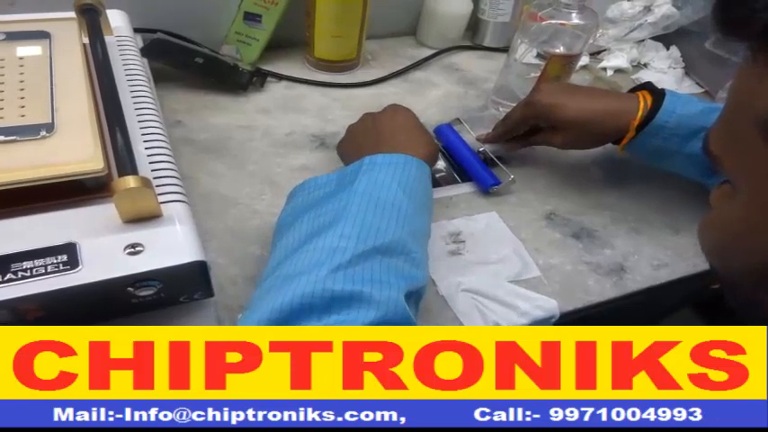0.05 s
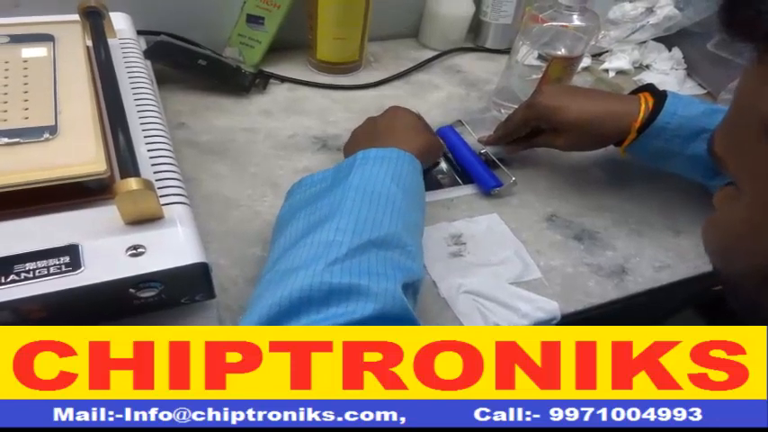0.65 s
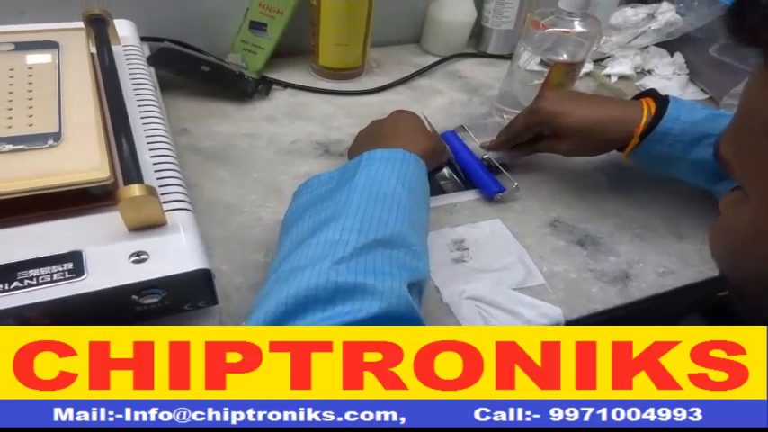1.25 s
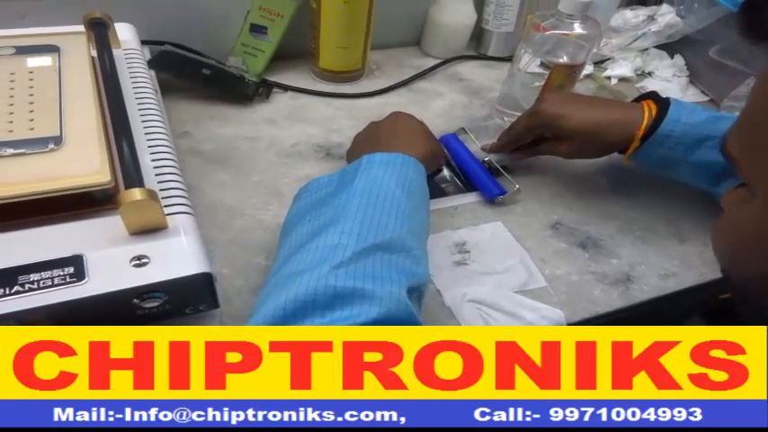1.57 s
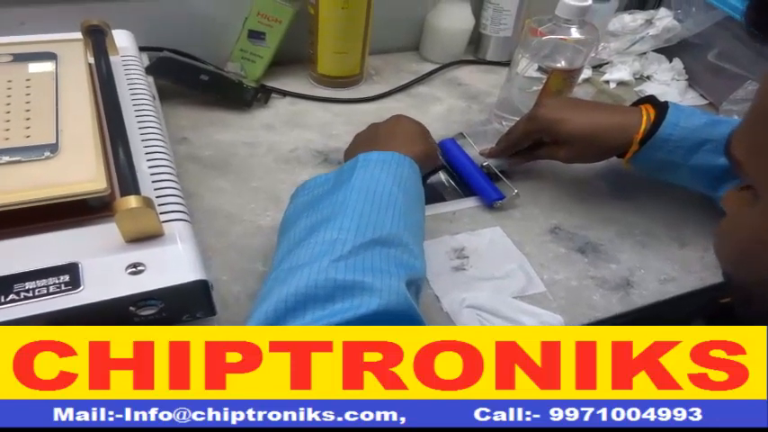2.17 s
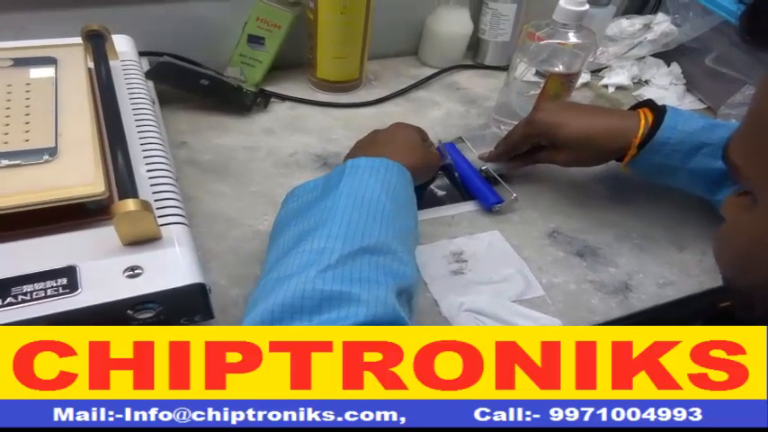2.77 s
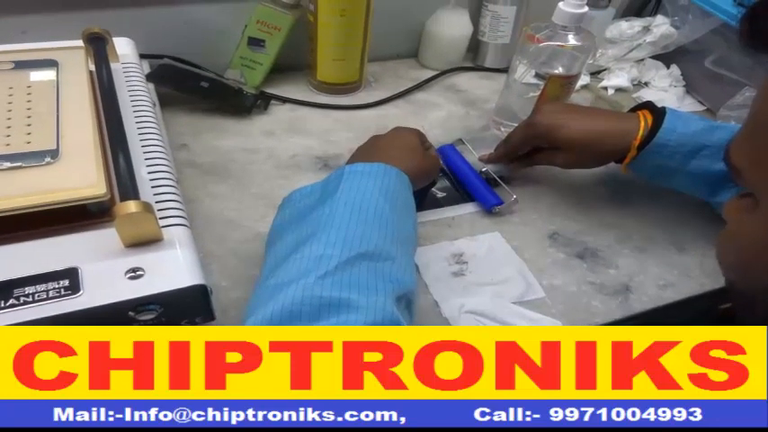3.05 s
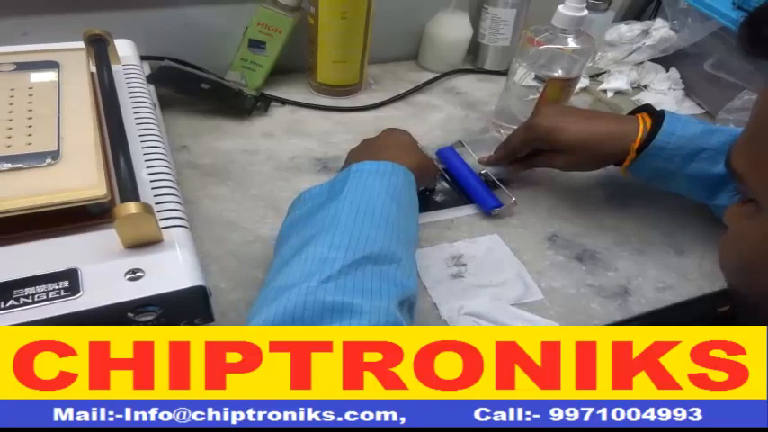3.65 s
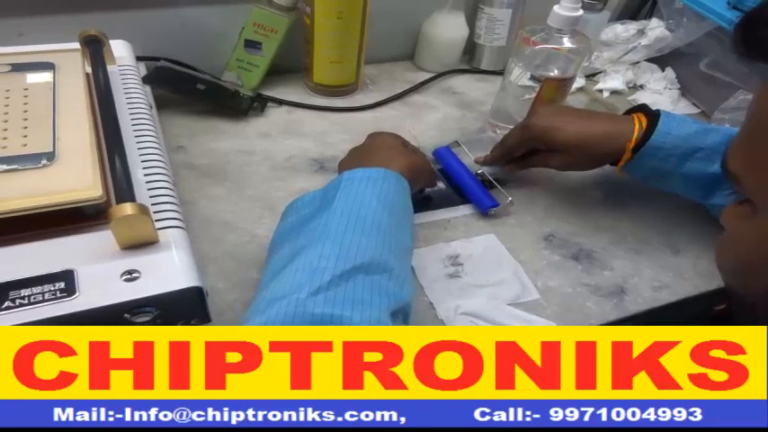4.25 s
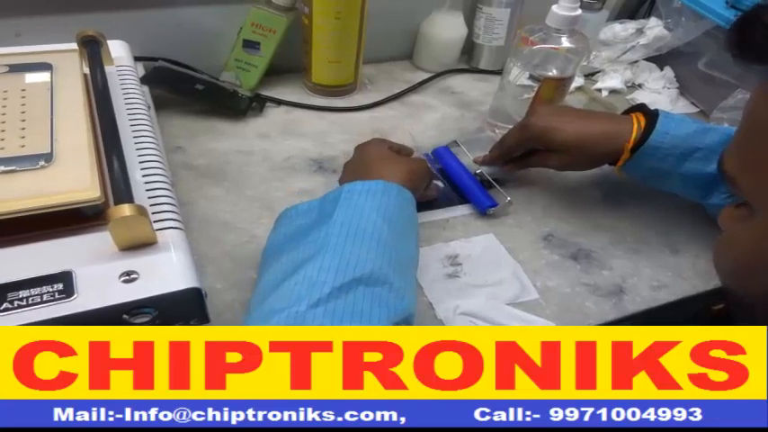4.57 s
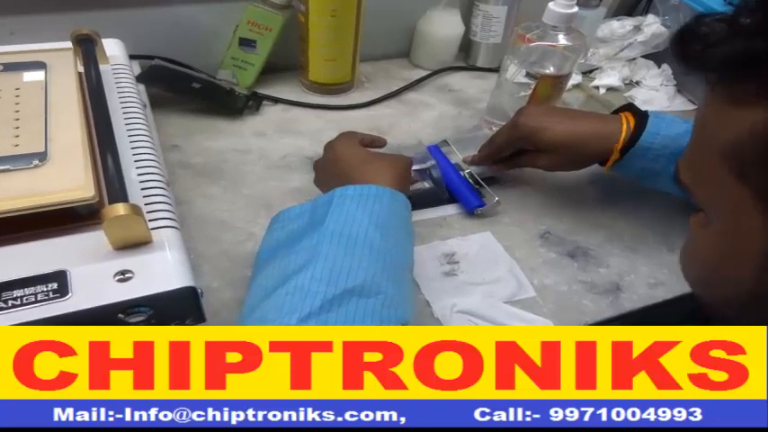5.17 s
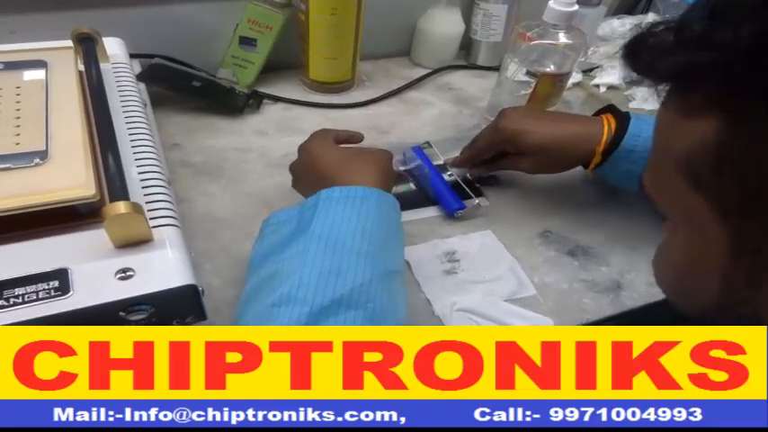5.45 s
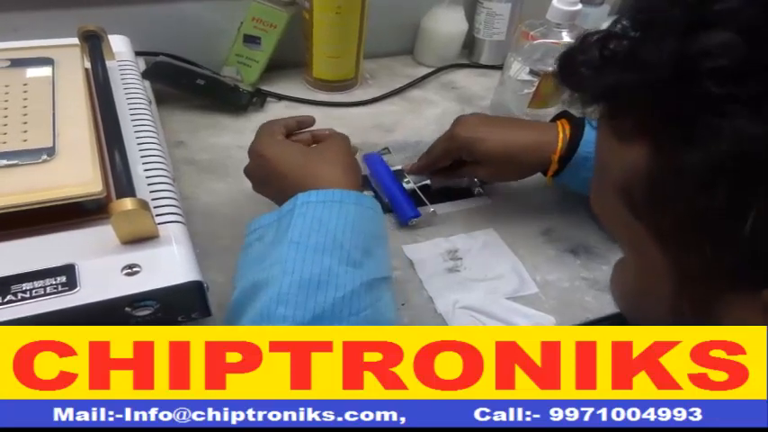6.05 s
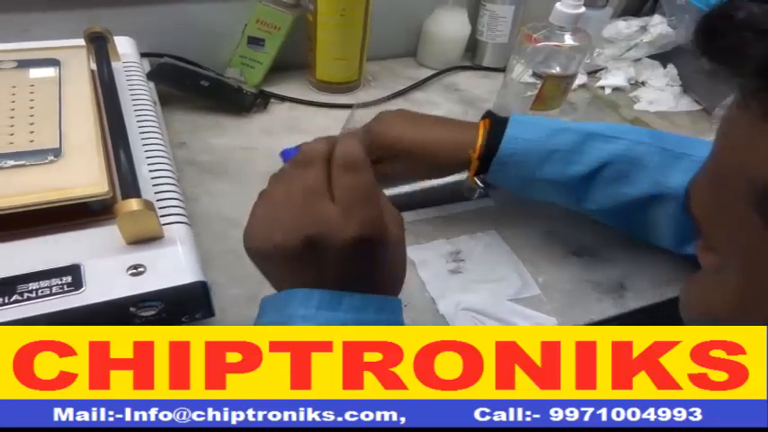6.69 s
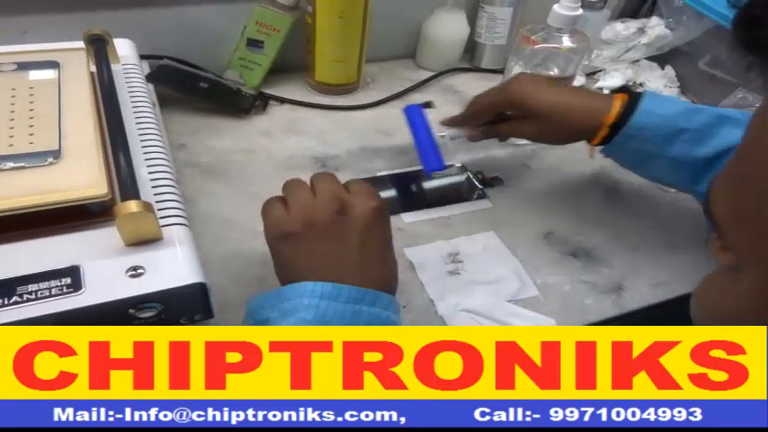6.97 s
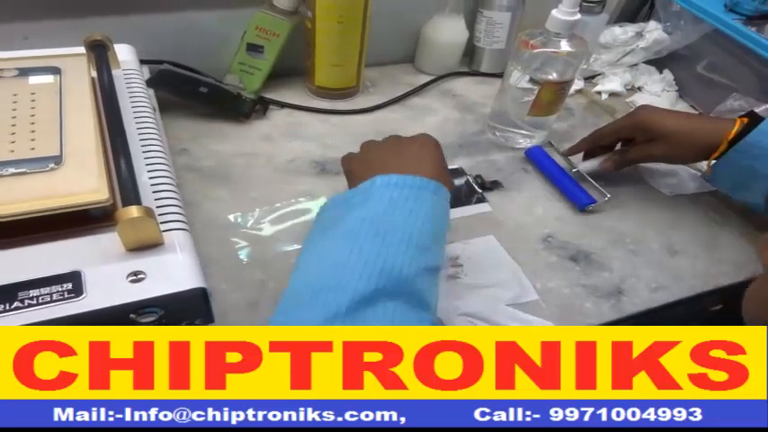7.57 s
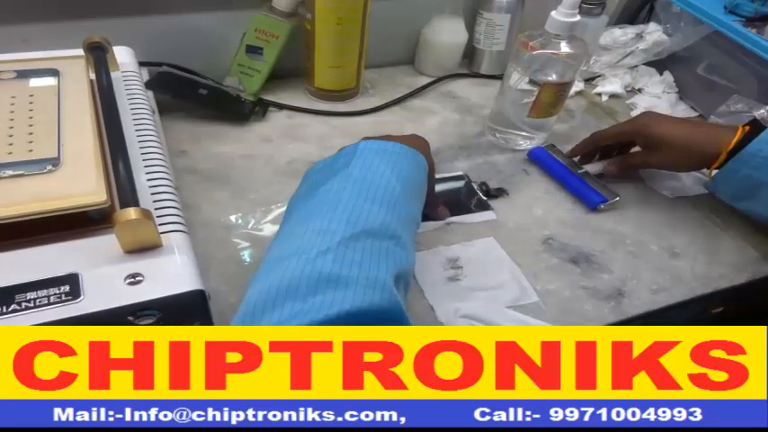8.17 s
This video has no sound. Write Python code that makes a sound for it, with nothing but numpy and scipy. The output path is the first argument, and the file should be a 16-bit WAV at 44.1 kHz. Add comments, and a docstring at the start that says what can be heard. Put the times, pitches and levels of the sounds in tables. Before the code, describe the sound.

A low machine hum and dull room noise run throughout in a small workroom, the hum growing slightly around 4 seconds. Straight ahead, adhesive film ticks and snaps as a rubber hand roller presses it onto glass, with the sharpest snaps at about 1.1 and 2.8 seconds and a few soft bumps on the bench. At 3.3 seconds the rubber gives a very short, high squeak, followed by light, scattered clicks until about 4.4 seconds. From 6 to 7 seconds the roller clicks and rattles in a quick cluster, while a sleeve rubs and the film slides with a crackly hiss, strongest around 6.5 seconds. Softer rustling continues. At 7.5 seconds the roller's metal frame clinks and bounces on the stone bench with a dull thud. A small click follows, then another clink and a low thump at about 8.3 seconds.

```python
"""A small room with a stone workbench, where a rubber hand roller presses adhesive film onto phone glass.
The film snaps as it sticks or lets go; the roller clicks against the glass and its rubber squeaks.
A sleeve and the film rustle as they slide. Put down, the roller's metal frame clinks and bounces
and the bench thuds. Behind the work, a machine hums and drones over steady room noise."""
import sys
import numpy as np
from scipy import signal
from scipy.fft import rfft, irfft
from scipy.io import wavfile

SR = 44100
rng = np.random.default_rng(int(sys.argv[2]) if len(sys.argv) > 2 else 0)


def store_pcm(level_fs):
    """Save levels as 16-bit WAV."""
    pcm = np.round(np.clip(level_fs, -1, 1) * 32767).astype(np.int16)
    wavfile.write(sys.argv[1], SR, np.atleast_2d(pcm).T)


N = 371406
LEAD_S = .005   # a contact gives for this long before it snaps

# how alike left and right are in the room: pitch_hz, correlation
STEREO_LIKENESS = [(50, 1), (130, 0.97), (270, 0.71), (570, -.3), (1200, -.25), (2400, 0.18), (5200, 0.46),
                   (10500, 0.86)]
# modes of the bench top: pitch_hz, level_db, t60_s
BENCH_MODES = [(122.5, 10, 0.085), (245, -8, 0.13), (285, -5, 0.3), (353, -14, 0.1), (400, -1, 0.15),
               (464, -6, 0.15), (488, -1, 0.22), (574, -29, 0.1), (658, 2, 0.18), (800, -27, .08),
               (1170, -19, .06)]
# snaps of the film: start_s, level_db, bright_db, t60_s, spot_hz, room_send_db, top_db
FILM_SNAPS = [(0.967, -46.5, 7, 0.068, 10000, -8, 4), (1.040, -49.5, 0, .025, 10000, -4, 3),
              (1.124, -20, 1.5, 0.042, 3480, -4.5, 7.5), (1.7013, -46.5, -6, 0.028, 6050, -18, 3),
              (1.732, -43, -9, 0.069, 6140, -2.5, -2), (2.360, -52.5, 10, 0.03, 9600, -2, -1),
              (2.389, -60, 4, .03, 9500, -6, 2), (2.5941, -38.5, 7, 0.057, 7160, -10, -3),
              (2.611, -46, -2, 0.033, 7200, -7, -2), (2.8022, -23.5, 0.5, 0.06, 6070, -6.5, -3.5),
              (4.2218, -39, -7, .045, 2700, -8, 2), (5.573, -43, 3, 0.04, 2670, -0.5, -2)]


def from_db(db):
    """Decibels to gain."""
    return 10 ** (np.asarray(db) / 20)


def rms_one(x):
    """Scale to an rms of 1."""
    return x / np.sqrt(np.mean(x ** 2) + 1e-20)


def above(db, still_db):
    """Gain of the part of a level that exceeds its resting value."""
    return np.sqrt(np.maximum(from_db(db) ** 2 - from_db(still_db) ** 2, 0))


def in_time(rows):
    """Each column of an automation table, at every sample."""
    times_s, *columns = np.transpose(rows)
    return [np.interp(np.arange(N) / SR, times_s, column) for column in columns]


def at_hz(points, hz):
    """Read a table on a log-frequency axis."""
    points = np.array(points)
    return np.interp(np.log(hz), np.log(points[:, 0]), points[:, 1])


def add(track, start_s, sound):
    """Mix a sound into a track."""
    start = round(start_s * SR)
    track[..., start:start + sound.shape[-1]] += sound[..., :N - start]


def drift(rate_hz):
    """Slow random wander with a spread of 1."""
    pole = np.exp(-80 * np.pi * rate_hz / SR)   # one step every 40 samples
    steps = rng.standard_normal(N // 40 + 2002)
    slow = signal.lfilter([1], [1, -2 * pole, pole * pole], steps)[2000:]
    return np.interp(np.arange(N) / 40, np.arange(len(slow)), rms_one(slow))


def ring(x, hz, t60):
    """A resonator: a unit click sets a decaying sine ringing."""
    radius, angle = from_db(-60 / (t60 * SR)), 2 * np.pi * hz / SR
    return signal.lfilter([0, np.sin(angle)], [1, -2 * radius * np.cos(angle), radius ** 2], x + 1e-18)


def dying(t, t60):
    """Exponential decay, 60 dB down after t60."""
    return np.exp(-np.log(1000) * t / t60)


def struck(t, hz, t60, phase=0):
    """One struck mode: a decaying sine."""
    return np.sin(2 * np.pi * hz * t + phase) * dying(t, t60)


def bell(grid, hz, width):
    """Shape of a resonance over frequency, 1 on top."""
    return 1 / (1 + (2 * (grid - hz) / width) ** 2)


def colour(x, spectrum):
    """Minimum-phase EQ that follows a spectrum in dB."""
    size = 1024
    grid = np.arange(size // 2 + 1) * SR / size + 1
    cepstrum = irfft(np.log(from_db(at_hz(spectrum, grid))))
    cepstrum[1:size // 2] *= 2
    cepstrum[size // 2 + 1:] = 0
    impulse = irfft(np.exp(rfft(cepstrum)))
    return signal.fftconvolve(x, impulse)[:len(x)]


def stereo_bands(size, direct=0):
    """Third-octave noise as (centre_hz, band); more direct sound narrows the stereo image."""
    edges = 22 * 2 ** (np.arange(29) / 3)
    white = rng.standard_normal((2, 2, size))
    for k, (low, high) in enumerate(zip(edges, edges[1:])):
        bandpass = signal.butter(2, [low, high], "band", fs=SR, output="sos")
        mid, side = signal.sosfilt(bandpass, white[k % 2])
        hz = np.sqrt(low * high)
        alike = np.clip(direct + (1 - direct) * at_hz(STEREO_LIKENESS, hz), -1, 1)
        yield hz, np.sqrt(1 + alike) * mid + np.sqrt(1 - alike) * side * [[1], [-1]]


def shaped_noise(spectrum, direct=0, flicker_db=2.4):
    """Stereo noise whose bands flicker slightly on their own; rms 1."""
    return rms_one(sum(from_db(at_hz(spectrum, hz) + flicker_db * drift(18)) * band
                       for hz, band in stereo_bands(N, direct)))


def room(x, build_s=0.00081):
    """A diffuse tail that builds up within milliseconds and dies sooner in the treble."""
    # reverb time: pitch_hz, t60_s
    decay_times = [(150, 0.88), (1000, 0.41), (4000, 0.37), (10000, 0.28)]
    t = np.arange(SR // 2) / SR
    tail = sum(band * dying(t, at_hz(decay_times, hz)) for hz, band in stereo_bands(len(t), direct=0.41))
    tail *= 1 - np.exp(-(t / build_s) ** 2)
    return signal.fftconvolve(x[None], rms_one(tail) / np.sqrt(len(t)), axes=1)[:, :N]


def room_tone(level_db=-50.5):
    """Steady, dark room noise."""
    # spectrum of the air: pitch_hz, density_db
    air_spectrum = [(22, -8), (50, -4.5), (110, 0), (180, -7.5), (280, -6.5), (500, -18.5), (850, -11.5),
                    (1200, -20.5), (1900, -20.5), (2400, -39), (3000, -29), (7000, -32.5), (11000, -36.5),
                    (14000, -62)]
    return from_db(level_db) * shaped_noise(air_spectrum)


def machine(hum_hz=99.6, waver_rad=0.69):
    """A machine and its fan drone in narrow resonances over a slightly wavering mains hum."""
    # resonances of machine and fan: pitch_hz, width_hz, level_db
    drone_modes = [(60.4, 2.7, -57), (122, 7.5, -53.5), (293, 13.7, -61.5), (987, 19, -67.5),
                   (1458, 20, -69.5), (1773, 65, -64.5)]
    # the hum dips, swells, then holds: time_s, level_db
    hum_curve = [(0, -52), (1.5, -55.5), (3.8, -47.5), (8.42, -47.5)]
    drone = 0
    for hz, width, db in drone_modes:
        spread = np.sqrt(np.clip(1 - at_hz(STEREO_LIKENESS, hz), 0, 1))
        drive = rng.standard_normal(N) + spread * rng.standard_normal((2, N))
        t60 = np.log(1000) / (np.pi * width)
        drone += from_db(db) * rms_one(ring(drive, hz, t60))
    hum_db, = in_time(hum_curve)
    hum = np.sqrt(2) * np.sin(2 * np.pi * hum_hz * np.arange(N) / SR + waver_rad * drift(2.0))
    return drone + from_db(hum_db + .5 * drift(5.7)) * hum


def faint_tone(peak_s=3.13, half_length_s=0.28, pitch_hz=318, level_db=-57.5):
    """A faint low tone comes and goes in the background."""
    t = np.arange(N) / SR
    swell = np.exp(-((t - peak_s) / half_length_s) ** 2)
    return from_db(level_db) * swell * np.sqrt(2) * np.sin(2 * np.pi * pitch_hz * t + 0.46 * drift(8))


def crackle(spectrum, grains_per_s=220):
    """Dense, tiny sticky crackles; rms 1."""
    sizes = from_db(4 * np.minimum(rng.exponential(1, N), 2.2))
    grains = sizes * (rng.random(N) < grains_per_s / SR)
    patter = signal.fftconvolve(grains, dying(np.arange(SR // 50) / SR, t60=.008))[:N]
    return rms_one(colour(patter * rng.standard_normal(N), spectrum))


def sliding(rub_gain_db=3.5, hiss_gain_db=-0.24, flutter_db=0.5):
    """The sleeve gives a dull rub, the film a crackly hiss; both flutter as they catch and slip."""
    # sleeve and film moving over the bench: time_s, rub_db, hiss_db
    slide_curves = [(0.12, -57.5, -65.5), (0.33, -60, -66.5), (1.21, -58.5, -61.5), (1.35, -59.5, -64.5),
                    (2.41, -59, -66.5), (2.75, -59.5, -61.5), (4.02, -57.5, -63), (4.49, -54, -55),
                    (4.95, -56.5, -60.5), (6.11, -53.5, -57), (6.22, -50.5, -49), (6.38, -42, -45),
                    (6.54, -44.5, -41), (6.75, -49.5, -49.5), (7.06, -52.5, -55), (7.49, -49.5, -52.5),
                    (8.07, -54, -59), (8.42, -57.5, -69)]
    # spectrum of the cloth: pitch_hz, density_db
    rub_spectrum = [(60, -6), (150, -7.5), (300, -2.5), (450, -4), (650, -0.5), (1100, -7), (1700, -7.5),
                    (3000, -28), (8000, -55)]
    # spectrum of the film: pitch_hz, density_db
    hiss_spectrum = [(300, -22), (1000, -15), (2200, 5.5), (3500, 1.5), (5000, 0.5), (7000, 0),
                     (10800, -4.5), (14000, -25)]
    rub_db, hiss_db = in_time(slide_curves)
    hiss = 0.99 * shaped_noise(hiss_spectrum, direct=0.31) + 0.58 * crackle(hiss_spectrum)
    film = from_db(hiss_gain_db) * above(hiss_db, still_db=-66.5) * hiss
    cloth = from_db(rub_gain_db) * above(rub_db, still_db=-60) * shaped_noise(rub_spectrum, direct=0.36)
    return from_db(flutter_db * drift(19)) * (film + cloth)


def scuffs():
    """Brief, bright swells of hiss and crackle as the film peels or is brushed."""
    # scuffs of the film: peak_s, half_length_s, level_db
    swells = [(0.523, 0.06, -64.5), (1.111, 0.006, -39), (3.09, 0.016, -57), (3.288, 0.0071, -54),
              (3.317, 0.01, -44), (3.36, .005, -47), (4.264, 0.0098, -39.5), (5.71, 0.037, -55),
              (5.895, 0.021, -52.5), (6.218, 0.0075, -31), (6.473, 0.042, -40), (7.005, 0.023, -38.5),
              (7.348, 0.09, -48)]
    # spectrum of a scuff: pitch_hz, density_db
    spectrum = [(300, -34), (1600, -13), (2900, 5), (4500, 2), (7000, 2), (10500, -3), (14000, -22)]
    t = np.arange(N) / SR
    level = sum(from_db(db) * np.exp(-.5 * ((t - peak_s) / half_s) ** 2) for peak_s, half_s, db in swells)
    return level * (0.95 * shaped_noise(spectrum, direct=0.52) + 0.59 * crackle(spectrum))


def hand_bumps(rise_s=0.018, t60_s=0.29):
    """A hand leaning on the bench swells its lowest mode."""
    # soft pushes: start_s, level_db
    pushes = [(0.245, -32), (1.396, -37), (3.402, -36)]
    out, t = np.zeros(N), np.arange(SR // 2) / SR
    bump = struck(t, BENCH_MODES[0][0], t60_s) * (1 - np.exp(-t / rise_s))
    for start_s, db in pushes:
        add(out, start_s, from_db(db) * bump)
    return out


def bench_knocks(split_hz=670.0, low_rise_s=0.0059, modes_db=-7.0):
    """Soft blows ring the bench over a dull thud whose lows linger; heavy ones make it all thump."""
    # blows on the bench: start_s, level_db, thump_db
    blows = [(3.358, -47, -15), (6.305, -36.5, 1), (6.429, -46, -19), (7.531, -35, -5), (7.556, -43, 8),
             (7.597, -46, -4), (8.334, -41.5, -13), (8.349, -43.5, 18)]
    # spectrum of the thud: pitch_hz, density_db
    thud_spectrum = [(50, -7.5), (130, 4), (200, -3.5), (300, 2.5), (480, -2.5), (680, -3.5), (900, -15),
                     (1500, -23), (4000, -29)]
    out, t = np.zeros(N), np.arange(SR // 2) / SR
    thump = struck(t, hz=157, t60=0.17)   # the whole bench bouncing
    crossover = [signal.butter(4, split_hz, side, fs=SR, output="sos") for side in ("low", "high")]
    for start_s, db, thump_db in blows:
        modes = sum(from_db(mode_db) * rng.choice([-1, 1]) * struck(t, hz, t60)
                    for hz, mode_db, t60 in BENCH_MODES)
        noise = rms_one(colour(rng.standard_normal(len(t)), thud_spectrum))
        low, high = (signal.sosfilt(side, noise) for side in crossover)
        thud = low * (1 - np.exp(-t / low_rise_s)) * dying(t, t60=0.45) + high * dying(t, t60=0.15)
        add(out, start_s, from_db(db) * (from_db(modes_db) * modes + from_db(thump_db) * thump + thud))
    return out


def rubber_squeaks(rise_s=0.0015, sag_hz_per_s=14000.0):
    """The rubber lets go of the glass with very short chirps that sag in pitch."""
    # slips of the rubber: start_s, pitch_hz, level_db, t60_s
    slips = [(3.3217, 3726, -10, 0.018), (3.3272, 3550, -27, 0.051)]
    out, t = np.zeros(N), np.arange(SR // 25) / SR
    onset = 1 - np.exp(-(t / rise_s) ** 2)
    for start_s, hz, db, t60 in slips:
        phase = 2 * np.pi * np.cumsum(hz - sag_hz_per_s * t) / SR
        add(out, start_s, from_db(db) * np.sin(phase) * onset * dying(t, t60))
    return out


def give(t):
    """The very short swell that leads into a snap."""
    return np.exp(np.minimum(t - LEAD_S, 0) / .001)


def contact_spectrum(bright_db, spot_hz, top_db, spot_db=7.5, spot_q=19.0):
    """EQ of one touch: a brighter one has less body and presence, and more top."""
    # resonances of glass, film and roller together: pitch_hz, width_hz, boost_db
    click_modes = [(1120, 42, 1.5), (2230, 65, 4), (3110, 42, 1), (3220, 81, -2), (3700, 99, -4.5),
                   (4150, 41, -0.5), (5540, 100, -1.5), (6120, 510, 3.5), (6550, 82, 3.5), (7060, 260, 1.5),
                   (8200, 120, 2), (8530, 210, -3.5), (9320, 93, 6), (10130, 830, 5)]
    grid = np.geomspace(100, 14000, 900)
    # every touch favours different resonances, and the touched spot adds one of its own
    resonances = sum((db + rng.normal(0, 2)) * bell(grid, hz, width) for hz, width, db in click_modes)
    spot = spot_db * bell(grid, spot_hz, spot_hz / spot_q)
    body, presence, top = -6 - bright_db, 1.05 - 0.55 * bright_db, top_db + 0.13 * bright_db
    tone = [(250, body - 6), (800, body), (2200, body - .5), (3200, presence), (4700, presence),
            (6200, 2.0), (8000, 3.0), (9800, top), (11000, top - 5), (13000, -22.0)]
    return np.column_stack([grid, at_hz(tone, grid) + resonances + spot])


def contact(bright_db, t60, spot_hz, top_db, spike, echo_share=.35):
    """A crack of height spike, its echo off the bench and a gritty burst: (direct, room send)."""
    t = np.arange(SR // 3) / SR
    attack, lead = SR // 200, round(LEAD_S * SR)
    spectrum = contact_spectrum(bright_db, spot_hz, top_db)
    grit_db = np.interp(t * 600, np.arange(201), rng.normal(0, 2.5, 201))
    burst = rng.standard_normal(len(t)) * from_db(grit_db) * give(t) * dying(t, t60)
    burst[lead] = spike
    echo_s = rng.uniform(.0012, .0024)
    burst[lead + round(echo_s * SR)] = echo_share * spike
    # the room gets the smoother sum of all directions
    all_round = .45 * burst
    all_round[lead] = .9 * np.linalg.norm(burst)
    click = np.array([colour(burst, spectrum), colour(all_round, spectrum)])
    attack_rms = np.sqrt(np.mean(click[0, lead:lead + attack] ** 2))
    return click / attack_rms


def frame_ring(scatter_db=4.0):
    """The roller's metal frame rings, with a new balance of modes at each hit."""
    # modes of the frame: pitch_hz, level_db, t60_s
    frame_modes = [(3320, 0, 0.06), (3540, 9, 0.049), (4450, 7, 0.085), (4750, 6, 0.075), (5880, 2, 0.07),
                   (6200, 12, 0.085), (6500, 7, .085), (7110, 11, 0.079), (7950, -1, .07), (8850, -2, 0.07),
                   (10600, 3, .07)]
    t = np.arange(SR // 3) / SR
    modes = sum(from_db(db + rng.normal(0, scatter_db)) * struck(t, hz, t60, rng.uniform(0, 2 * np.pi))
                for hz, db, t60 in frame_modes)
    return give(t) * modes


def frame_landings(ring_db=-14, send_db=-9.5, bounce_loss_db=3, bounce_brighter_db=9):
    """The frame clinks on the stone and bounces once, weaker and brighter: (direct, room send)."""
    # the frame grazes the bench or lands: start_s, level_db, bright_db, bounce_after_s
    hits = [(7.512, -39, 12, .002), (7.517, -22.5, 14, .0045), (7.535, -21, 1.5, 0.0135),
            (7.5535, -32, 1, .012), (8.331, -39, 8, 0.0018), (8.335, -25.5, 0.5, 0.0105)]
    out = np.zeros((2, N))
    for start_s, db, bright_db, bounce_s in hits:
        for k in range(2):
            clack = contact(bright_db + k * bounce_brighter_db, t60=0.058, spot_hz=6300, top_db=0, spike=0)
            clink = clack + from_db(ring_db) * frame_ring()
            add(out, start_s + k * bounce_s - LEAD_S, from_db(db - k * bounce_loss_db) * clink)
    return out * from_db([[0], [send_db]])


def roller_clicks(send_db=-8.5):
    """Clicks and short rattles of the roller, damped by the hand: (direct, room send)."""
    # the roller against the glass and in its frame: start_s, level_db, bright_db, t60_s, spot_hz
    touches = [(3.3226, -29, -11, 0.038, 7300), (3.359, -32, -11.5, 0.08, 2860),
               (3.6178, -34, -4.5, 0.028, 1870), (3.71, -46.5, -11, 0.19, 4800),
               (3.773, -50, -27, 0.049, 1800), (4.023, -50, -14, 0.15, 2820),
               (4.266, -37.5, -9.5, 0.083, 6100), (4.406, -46, -12.5, 0.06, 3100),
               (6.0612, -25.5, -0.5, 0.04, 3120), (6.197, -43, 9, 0.037, 6200),
               (6.208, -19.5, 1, 0.15, 7370), (6.2272, -21.5, -5, 0.14, 3030), (6.2407, -28, 1, .06, 5000),
               (6.276, -30, -7, 0.21, 3750), (6.4284, -18.5, -0.5, 0.07, 3090),
               (6.620, -36.5, 0, 0.064, 6100), (6.637, -30, -2.5, 0.098, 6650),
               (6.658, -31, -8, 0.11, 3780), (6.715, -40, -21, 0.076, 2900), (6.847, -33.5, 0, 0.055, 5700),
               (6.863, -35.5, -14, 0.081, 5000), (7.172, -37, -14, 0.16, 2600),
               (7.238, -44, -19, .06, 3100), (7.834, -42, 2, 0.049, 4600)]
    out = np.zeros((2, N))
    for start_s, db, bright_db, t60, spot_hz in touches:
        click = contact(bright_db, t60, spot_hz, top_db=-1, spike=1.2)
        add(out, start_s - LEAD_S, from_db([[db], [db + send_db]]) * click)
    return out


def film_ring():
    """Each snap leaves the taut film ringing briefly."""
    # modes of the film: pitch_hz, level_db, t60_s
    film_modes = [(3520, -24, 0.3), (3640, -21, .24), (3900, -20, .2), (4700, -26, .18)]
    out, t = np.zeros(N), np.arange(SR // 3) / SR
    ringing = sum(from_db(db) * struck(t, hz, t60) for hz, db, t60 in film_modes)
    for start_s, db, *_ in FILM_SNAPS:
        add(out, start_s, from_db(db) * ringing)
    return out


def film_snaps():
    """The film cracks sharply as it sticks to the glass or lets go: (direct, room send)."""
    out = np.zeros((2, N))
    for start_s, db, bright_db, t60, spot_hz, send_db, top_db in FILM_SNAPS:
        snap = contact(bright_db, t60, spot_hz, top_db, spike=8.0)
        add(out, start_s - LEAD_S, from_db([[db], [db + send_db]]) * snap)
    return out


def scene(thud_send_db=-11.0, squeak_send_db=-18.0, pan_db=0.7):
    """Work at the bench straight ahead, in its room; the roller is put down a little to the right."""
    clicks, clicks_send = film_snaps() + roller_clicks()
    clinks, clinks_send = frame_landings()
    thuds, squeaks = bench_knocks() + hand_bumps(), rubber_squeaks()
    direct = clicks + film_ring() + thuds + squeaks + clinks * from_db([[-pan_db], [pan_db]])
    send = clicks_send + clinks_send + from_db(thud_send_db) * thuds + from_db(squeak_send_db) * squeaks
    return direct + room(send) + sliding() + scuffs() + room_tone() + machine() + faint_tone()


def record(dry, cutoff_hz=10950):
    """A steep low-pass cuts the top."""
    return signal.sosfilt(signal.ellip(12, .2, 75, cutoff_hz, fs=SR, output="sos"), dry)


dry = scene()
out = record(dry)
store_pcm(out)
```